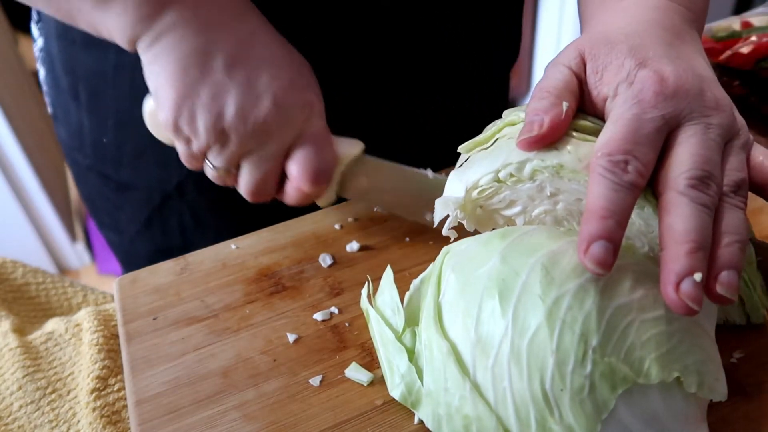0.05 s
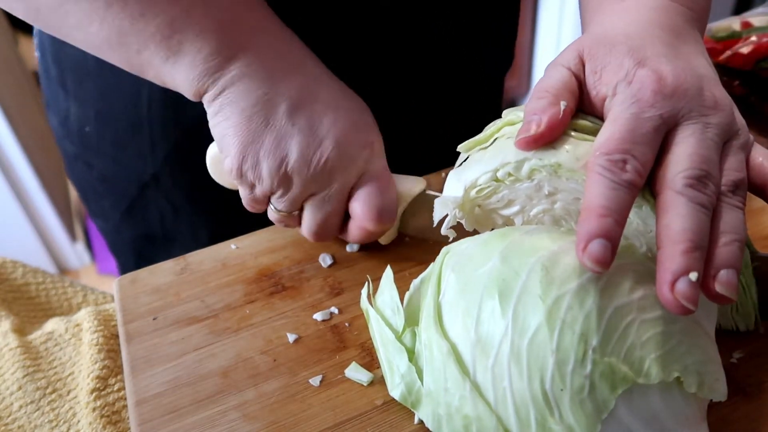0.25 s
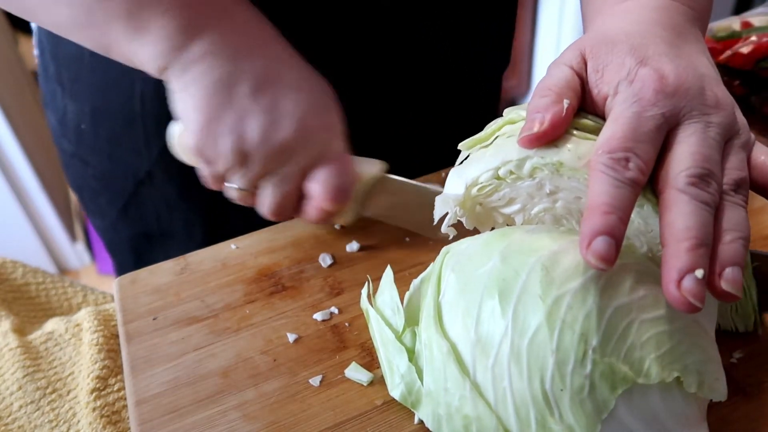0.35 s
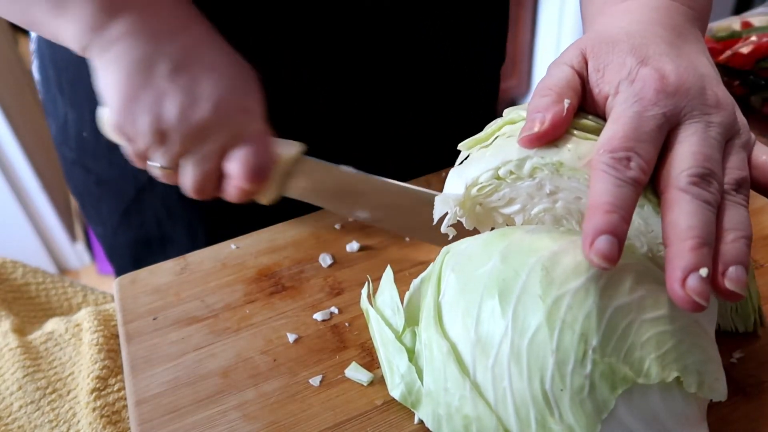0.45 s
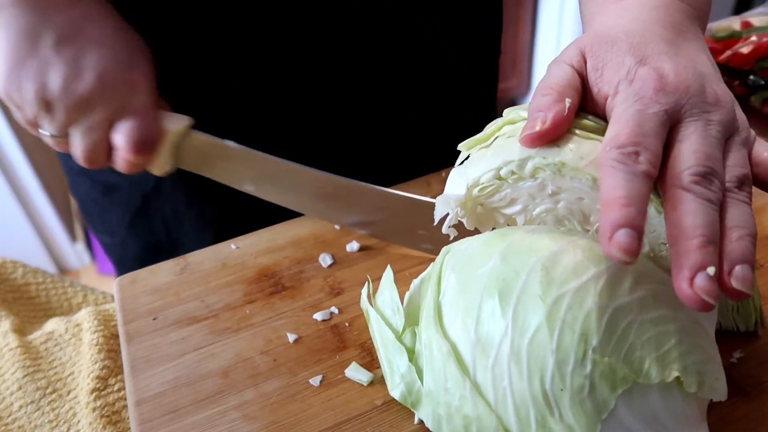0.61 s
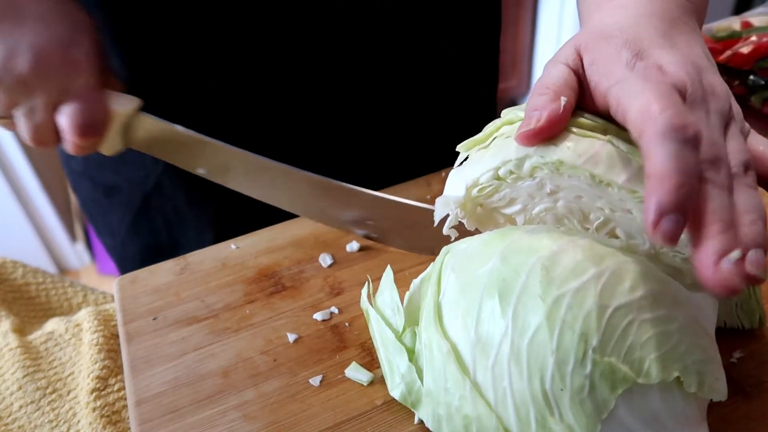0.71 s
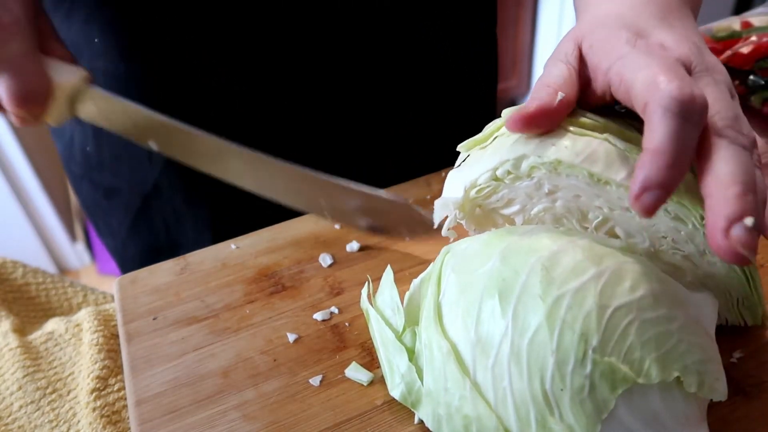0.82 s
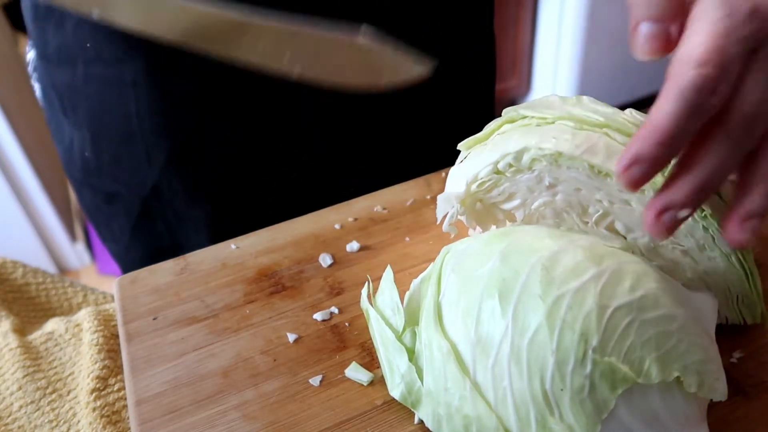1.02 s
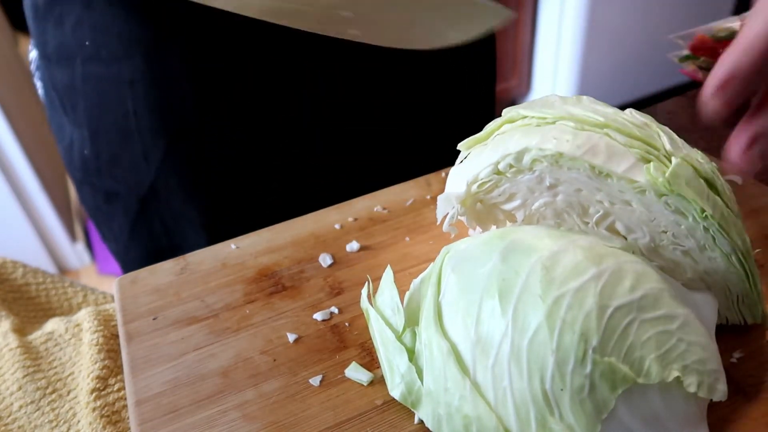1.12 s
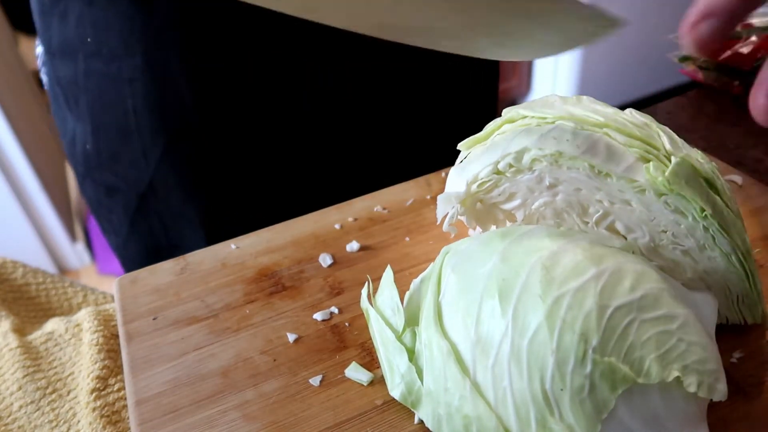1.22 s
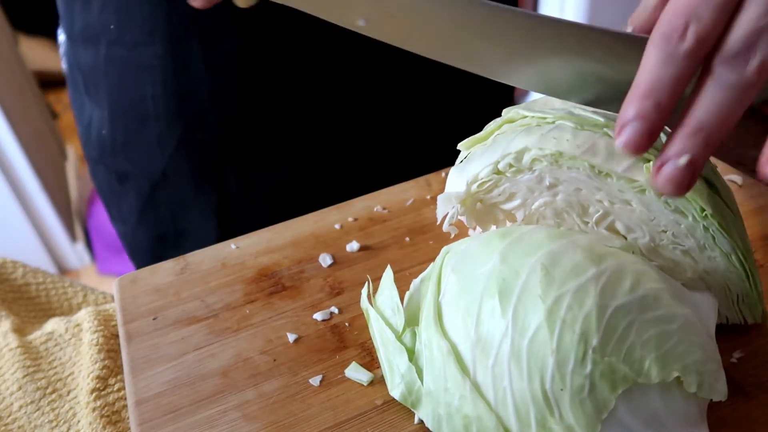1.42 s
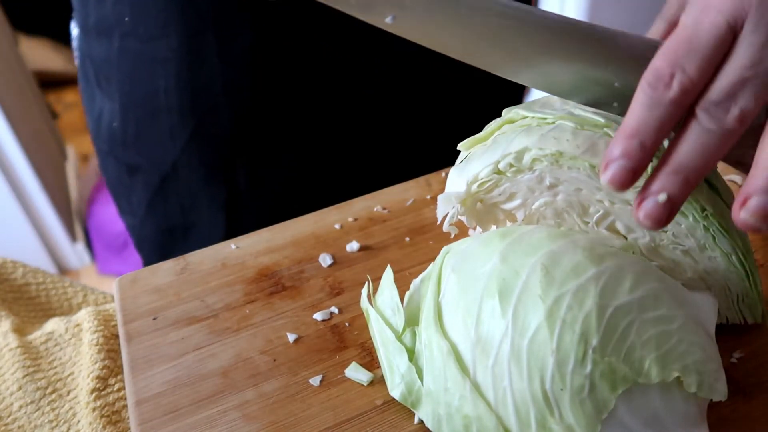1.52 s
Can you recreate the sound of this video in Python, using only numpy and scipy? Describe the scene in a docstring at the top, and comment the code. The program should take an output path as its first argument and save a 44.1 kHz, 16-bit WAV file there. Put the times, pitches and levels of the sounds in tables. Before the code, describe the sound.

A knife crunches down through a cabbage and knocks hard on a wooden board, then slides back.

```python
"""A kitchen knife crunches down through half a cabbage, knocks hard on the wooden board and touches it twice more,
then is drawn back out: its edge rubs the board and hisses past leaves that tick and rustle; the half settles softly.
Crunch and rub are random snaps, coloured or rung through board modes; the knocks are half-sine pushes into them.
An appliance hums under it all; a small stereo microphone clips its peaks and ducks its gain after loud sound."""
import sys
import numpy as np
from scipy import signal
from scipy.fft import rfft, irfft, next_fast_len
from scipy.io import wavfile
from scipy.ndimage import uniform_filter1d

SR = 44100
rng = np.random.default_rng(int(sys.argv[2]) if len(sys.argv) > 2 else 0)


def transcribe(signal):
    """Save signal, clipped to [-1, 1], as a 16-bit WAV file at the path in sys.argv[1]."""
    frames = np.atleast_2d(signal).T
    limited = np.clip(frames, -1, 1)
    pcm = np.round(limited * 32767).astype(np.int16)
    wavfile.write(sys.argv[1], SR, pcm)


N = 68355

# modes of the wooden board: pitch_hz, struck_db, t60_s, rubbed_db,
# best_s (moment of the draw that rubs the mode best), span_s (for how long)
BOARD_MODES = [(102, -3, 0.057, -47, 0.48, 0.12), (186.5, -1.5, 0.11, -30, .5, 0.24),
               (292, -8.5, 0.09, -36, .5, .3), (466, -8.5, 0.079, -28, 0.3, 0.15),
               (661.3, 2.5, 0.063, 6.5, 0.62, 0.093), (785.7, 5, 0.052, 0, 0.72, 0.32),
               (916, -8.5, 0.14, -5.5, 0.44, 0.068), (1180, -14, 0.17, -1, 0.8, 0.067),
               (1291, 7, 0.029, 5.5, 0.653, 0.16), (1383, -6, 0.1, -4, 0.73, 0.25),
               (1549, 7.5, 0.025, 0.5, 0.36, 0.6), (1940, -21, 0.02, -17, .6, .3),
               (2100, 2, 0.026, -6.5, .65, 0.39), (2410, -44, 0.027, -2, 0.533, .1)]
SWELL_T60_S = 0.0049   # a mode takes a moment to take up the blow


def amp(db):
    """Decibels to amplitude."""
    return 10 ** (np.asarray(db) / 20)


def unit(x):
    """Scale to an rms of 1."""
    return x / np.sqrt(np.mean(x ** 2) + 1e-20)


def in_time(rows):
    """Draw each column after the first as a curve over the scene, straight between its points."""
    s, *columns = np.transpose(rows)
    return [np.interp(np.arange(N) / SR, s, column) for column in columns]


def at_hz(points, hz):
    """Read a (Hz, dB) curve on a logarithmic frequency axis."""
    point_hz, point_db = np.array(points).T
    return np.interp(np.log(hz), np.log(point_hz + 1), point_db)


def drift(rate_hz):
    """Slow random wander of rms 1: noise through two equal low-pass poles."""
    step = 40   # samples between slow values
    r = np.exp(-2 * np.pi * rate_hz * step / SR)
    noise = rng.standard_normal(N // step + 2002)
    slow = signal.lfilter([1], [1, -2 * r, r * r], noise)[2000:]   # skip the filter's run-in
    return np.interp(np.arange(N) / step, np.arange(len(slow)), unit(slow))


def ring(x, hz, t60_s):
    """A damped mode: a unit click sets a sine of height 1 ringing."""
    r = amp(-60 / (t60_s * SR))
    w = 2 * np.pi * hz / SR
    return signal.lfilter([0, np.sin(w)], [1, -2 * r * np.cos(w), r * r], x + 1e-18)


def band(x, hz, ratio):
    """Band-pass from hz / ratio to hz * ratio."""
    return signal.sosfilt(signal.butter(2, [hz / ratio, hz * ratio], "band", fs=SR, output="sos"), x)


def highpass(x, hz):
    """Take away the low end."""
    return signal.sosfilt(signal.butter(2, hz, "high", fs=SR, output="sos"), x)


def grains(per_s, spread_db):
    """Two unrelated streams of random snaps of uneven size."""
    size_db = spread_db * np.minimum(rng.exponential(1, (2, N)), 5)
    snaps = amp(size_db) * rng.standard_normal((2, N))
    return unit(snaps * (rng.random((2, N)) < per_s / SR))


def colour(x, spectrum, patchy_db):
    """Half-octave bands, each with its level and flicker, partly shared; rms 1."""
    out = 0
    together = drift(6.0)
    edges = 22 * 2 ** np.arange(0, 9.6, .5)
    for k, (low, high) in enumerate(zip(edges, edges[1:])):
        part = signal.sosfilt(signal.butter(2, [low, high], "band", fs=SR, output="sos"), x)
        flicker_db = patchy_db * (.6 * together + drift(15))
        level_db = at_hz(spectrum, np.sqrt(low * high)) + flicker_db
        out = out + (-1) ** k * part * amp(level_db)   # neighbours in opposite polarity
    return unit(out)


def cut():
    """Leaves snap densely and set the board sounding; the push makes board and counter shudder."""
    # the blade goes through the leaves: time_s, crunch_db, shudder_db
    cut_curve = [(0, -53, -43), (.03, -39.5, -41), (.06, -37.5, -43), (.1, -36.5, -38.5), (.15, -36, -34.5),
                 (.18, -32.5, -34), (.197, -29.5, -20), (.209, -27, -30), (.216, -84, -46),
                 (.24, -93.5, -66)]
    # tone of the snapping leaves: pitch_hz, relative level [dB per Hz]
    crunch_spectrum = [(210, -30), (350, -11), (409, -27), (663, 0), (864, -8.5), (949, -2.5), (1740, -10),
                       (2450, -11), (10100, -37.5), (12400, -30), (14500, -52)]
    # tone of the low shudder: pitch_hz, relative level [dB per Hz]
    shudder_spectrum = [(24, -47), (40, -5), (107, 2.5), (210, 4), (259, -36), (300, -14), (400, -16),
                        (520, -34), (880, -120)]
    in_board_db = -5.5   # board against leaves in the crunch

    crunch_db, shudder_db = in_time(cut_curve)
    snaps = grains(9000, 2.1)
    board = unit(sum(amp(rubbed_db) * unit(ring(snaps, hz, t60_s))
                     for hz, _, t60_s, rubbed_db, _, _ in BOARD_MODES))
    crunch = colour(snaps, crunch_spectrum, 1.0) + amp(in_board_db) * board
    shudder = colour(rng.standard_normal((2, N)), shudder_spectrum, 1.5)
    return amp(crunch_db) * crunch + amp(shudder_db) * shudder


def knocks():
    """Each contact is a half-sine push into the board modes and the room; the first adds a bright crack."""
    # blade on board: start_s, strength_db, contact_ms
    contacts = [(.2098, -7, 0.32), (.2322, -26, 0.16), (.2450, -29, 0.74)]
    radiates_above_hz = 150
    crack_hz, crack_db, crack_t60_s = 4050, -8, 0.011   # level before band-passing

    push = np.zeros(N)
    for start_s, strength_db, contact_ms in contacts:
        length = contact_ms * SR / 1000
        shape = np.sin(np.pi * np.arange(1, length) / length)
        first = int(start_s * SR)
        push[first:first + len(shape)] += amp(strength_db) * shape / shape.sum()

    board = 0
    swell = 2 * (1 - amp(-60 / (SWELL_T60_S * SR)))   # offsets the gain of the second ring
    for k, (hz, struck_db, t60_s, *_) in enumerate(BOARD_MODES):
        mode = ring(ring(push, hz, t60_s), hz, SWELL_T60_S)
        board = board + (-1) ** k * amp(struck_db) * swell * mode
    board = highpass(board, radiates_above_hz)

    since_s = np.arange(N) / SR - contacts[0][0]
    fade = (since_s > 0) * amp(-60 * np.maximum(since_s, 0) / crack_t60_s)
    burst = rng.standard_normal((2, N)) * fade
    crack = band(band(burst, crack_hz, 1.4), crack_hz, 1.4)
    return board * [[1], [0]] + amp(crack_db) * crack + kitchen(push)   # board in the mid only


def kitchen(push):
    """Rattle and reflections after a blow: noise that dies band by band."""
    # tail of a blow: pitch_hz, level_db, t60_s
    tail_bands = [(205, -31.5, 0.45), (342, -42, 0.12), (510, -33, 0.18), (770, -17.5, 0.3),
                  (1020, -29, 0.14), (1362, -14.5, 0.28), (2000, -30, .28), (2900, -37, 0.36),
                  (4000, -30.5, 0.29), (6100, -29, 0.42), (9000, -35, .35)]
    t = np.arange(SR // 2) / SR
    tail = 0
    for hz, level_db, t60_s in tail_bands:
        noise = unit(band(rng.standard_normal((2, len(t))), hz, 1.2))
        tail = tail + amp(level_db - 60 * t / t60_s) * noise
    tail = tail * np.minimum(t / 0.0041, 1)   # 4.1 ms fade-in
    return signal.fftconvolve(push[None], tail, axes=1)[:, :N]


def draw_back():
    """The edge rubs the board modes into sounding, other ones as it travels, and hisses past the leaves."""
    # the blade is drawn back: time_s, rub_db (edge on board), hiss_db (steel on leaves)
    draw_curve = [(.33, -88, -75), (.37, -51, -56.5), (.42, -42.5, -53.5), (.5, -40.5, -51.5),
                  (.55, -40.5, -49.5), (.63, -44.5, -49.5), (.69, -48.5, -51.5), (.725, -48, -50.5),
                  (.77, -53, -43.5), (.815, -40.5, -44.5), (.84, -56, -47), (.9, -54, -53),
                  (.95, -60.5, -57), (.97, -84, -64), (1.12, -69, -63), (1.2, -87, -84)]
    # tone of steel on leaves: pitch_hz, relative level [dB per Hz]
    hiss_spectrum = [(710, -47), (1200, -5.5), (1510, -4), (1570, -6), (2360, -4), (3550, -13.5),
                     (4460, -13.5), (7140, -26), (11600, -30.5), (14500, -33)]
    rub_fade_db = 11   # most that a mode sinks away from its best moment

    rub_db, hiss_db = in_time(draw_curve)
    t = np.arange(N) / SR
    slips = grains(4000, 1.9)
    rub = 0
    for hz, _, t60_s, rubbed_db, best_s, span_s in BOARD_MODES:
        fade_db = rub_fade_db * np.tanh(((t - best_s) / span_s) ** 2 / 2)
        mode = unit(ring(ring(slips, hz, t60_s), hz, SWELL_T60_S))
        rub = rub + amp(rubbed_db - fade_db) * mode
    hiss = colour(grains(12000, 0.67), hiss_spectrum, 2.3)
    return amp(rub_db) * unit(rub) + amp(hiss_db) * hiss


def ticks():
    """Leaves rustle briefly: puffs of band-passed snaps that rise fast and fade exponentially."""
    # one puff each: peak_s, level_db, centre_hz, fade_ms (time constant)
    puffs = [(0.365, -54, 1500, 8), (0.495, -41, 2260, 11), (.761, -50.5, 2530, 5),
             (.870, -39.5, 2000, 4.3), (0.888, -50, 2430, 6.5), (0.937, -45.5, 2400, 9.5),
             (0.978, -52, 1600, 7.5), (1.047, -54, 2040, 23), (1.108, -49, 2280, 9.6),
             (1.249, -55.5, 3200, 7.1)]
    t = np.arange(N) / SR
    snaps = grains(12000, 1.1)
    out = 0
    for peak_s, level_db, hz, fade_ms in puffs:
        time_constant_s = np.where(t < peak_s, .001, fade_ms / 1000)
        envelope = np.exp(-np.abs(t - peak_s) / time_constant_s)
        out = out + amp(level_db) * unit(band(snaps, hz, 1.35)) * envelope
    return out


def thump():
    """The cabbage half settles softly: one click rings two low damped modes."""
    # the lower mode: start_s, level_db, pitch_hz, t60_s
    settling = (.367, -31, 113, 0.34)
    start_s, level_db, hz, t60_s = settling
    push = amp(level_db) * (np.arange(N) == int(start_s * SR))
    bump = ring(push, hz, t60_s) + 0.55 * ring(push, 1.6 * hz, t60_s / 2)
    return bump * [[1], [0]]   # mid only


def room_tone():
    """Broad rumble and air, with two wavering appliance tones; the low end swells and sinks."""
    # tone of the room: pitch_hz, relative level [dB per Hz]
    air_spectrum = [(15, -41), (25, -6.5), (63, -4.5), (117, -6), (175, -7.5), (275, -12), (661, -19),
                    (735, -3.5), (862, -22), (1100, -23), (4490, -38), (12700, -53), (14500, -70)]
    # appliance tones: pitch_hz, level_db (about which it wavers)
    hum_tones = [(168.7, -46.5), (229.9, -51.5)]
    # swell of the low end: time_s, gain_db
    rumble_curve = [(0, -2), (.3, -2.5), (.6, -3), (.9, 0), (.97, -2.5), (1.05, 3.5), (1.16, -2), (1.22, 4),
                    (1.45, 2), (1.55, 3.5)]
    air_db, rumble_below_hz = -43.5, 400
    waver_db, waver_hz = 3, 2.5

    t = np.arange(N) / SR
    tone = amp(air_db) * colour(rng.standard_normal((2, N)), air_spectrum, 0.76)
    for hz, level_db in hum_tones:
        level = amp(level_db + waver_db * drift(waver_hz))
        phase = 2 * np.pi * hz * t + 0.77 * drift(1.4)
        tone = tone + level * np.sqrt(2) * np.sin(phase)
    low = signal.sosfilt(signal.butter(1, rumble_below_hz, fs=SR, output="sos"), tone)
    return tone + (amp(in_time(rumble_curve)[0]) - 1) * low


def ports(pair, side_table, lean):
    """Mid is the first stream; side is partly the same sound a quarter turn late, partly the second stream."""
    in_step = .62   # share of the side that comes from the spacing of the two ports
    size = next_fast_len(N + 4096)
    mid, other = rfft(pair, size)
    side_gain = amp(at_hz(side_table, np.arange(1, len(mid) + 1) * SR / size))
    side = side_gain * (-(1j + lean) * in_step * mid + np.sqrt(1 - in_step ** 2) * other)
    return irfft(np.array([mid + side, mid - side]), size)[:, :N]


def scene():
    """The knife and cabbage lean a little to the right, over the room tone."""
    # side against mid for knife and cabbage: pitch_hz, side_db
    near_side = [(60, -36), (110, -56), (200, -29), (370, -14), (680, -21), (1250, -16), (2300, -13),
                 (4230, -4), (7760, 1), (14200, 7.5)]
    # side against mid for the room tone: pitch_hz, side_db
    air_side = [(60, -45.5), (110, -36.5), (200, -24.5), (370, -8), (680, -11.5), (1250, -7.5), (2300, -4),
                (4230, -1.5), (7760, -1.5), (14200, 6.5)]
    near = cut() + knocks() + draw_back() + ticks() + thump()
    return ports(near, near_side, lean=0.32) + ports(room_tone(), air_side, lean=0)


def record(dry):
    """Gain ducks after loud sound and creeps back; peaks clip softly; the top is cut."""
    duck_above_db, duck_ratio = -21, 0.26   # ratio in dB of duck per dB above
    recover_db_per_s, duck_smooth_s = 0.5, .03
    overload, knee = 1.03, 5   # clipping ceiling, hardness of the bend
    cutoff_hz = 15300

    power = uniform_filter1d(np.mean(dry ** 2, axis=0), size=441)   # over 10 ms
    level_db = 10 * np.log10(power + 1e-12)
    slope = recover_db_per_s * np.arange(N) / SR
    wanted_db = duck_ratio * (level_db - duck_above_db)
    # the deepest duck so far holds, less what has been recovered since
    duck_db = np.maximum(np.maximum.accumulate(wanted_db + slope) - slope, 0)
    r = np.exp(-1 / (duck_smooth_s * SR))
    ducked = dry * amp(-signal.lfilter([1 - r], [1, -r], duck_db))
    clipped = ducked / (1 + np.abs(ducked / overload) ** knee) ** (1 / knee)
    return signal.sosfilt(signal.cheby2(12, 70, cutoff_hz, fs=SR, output="sos"), clipped)


dry = scene()
out = record(dry)
transcribe(out)
```